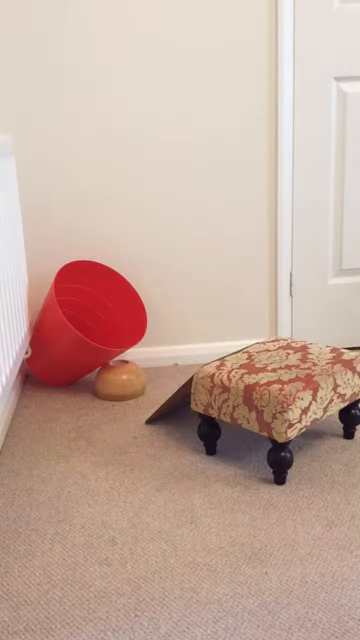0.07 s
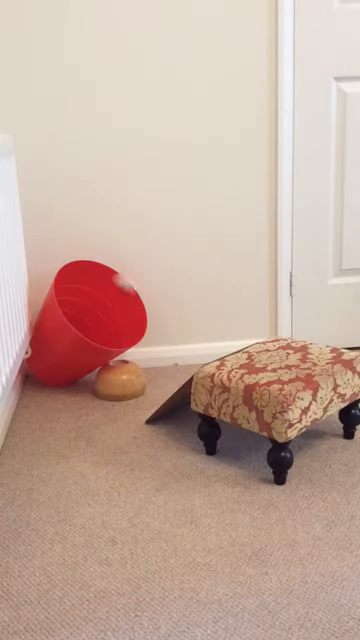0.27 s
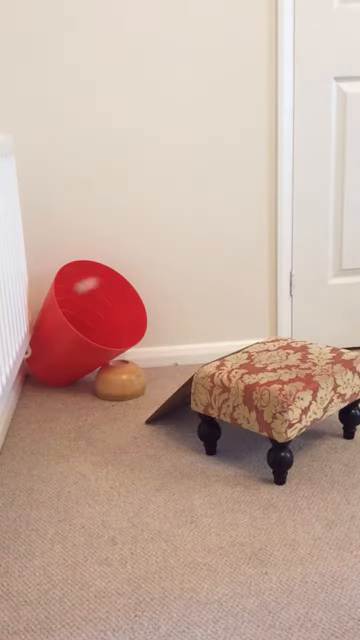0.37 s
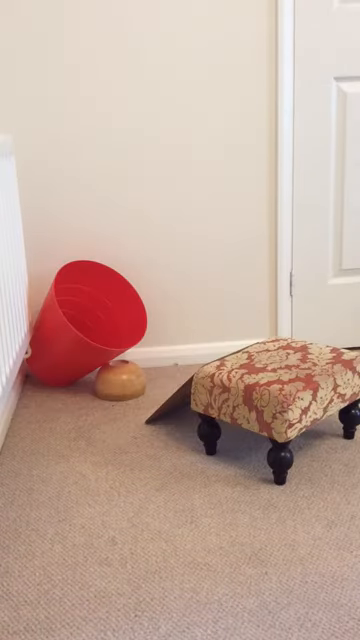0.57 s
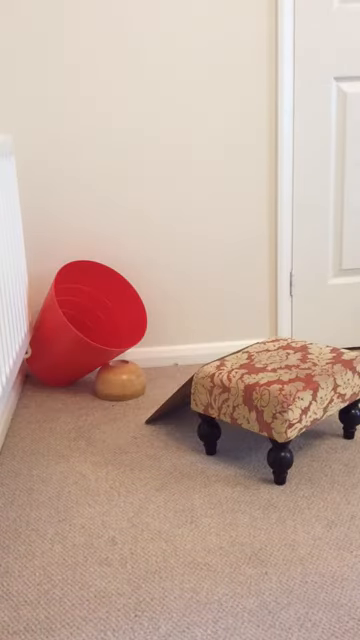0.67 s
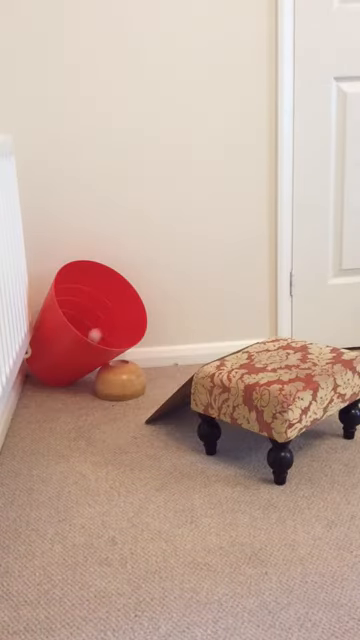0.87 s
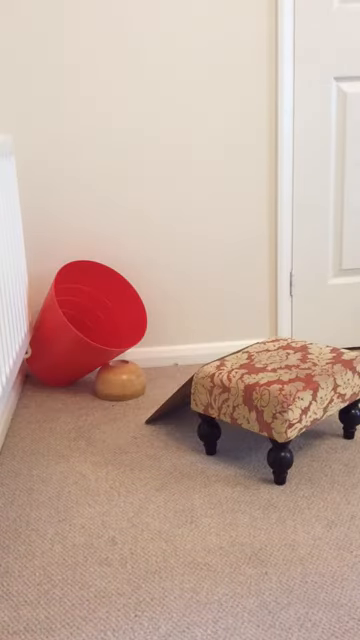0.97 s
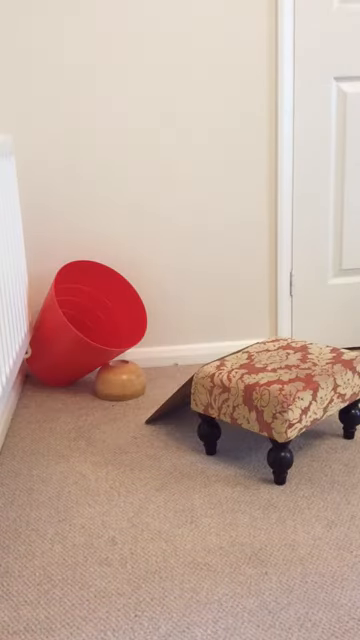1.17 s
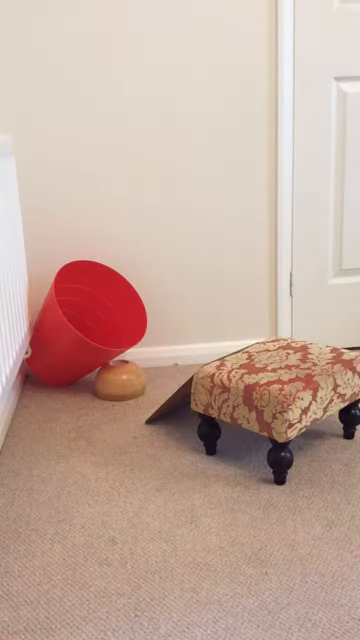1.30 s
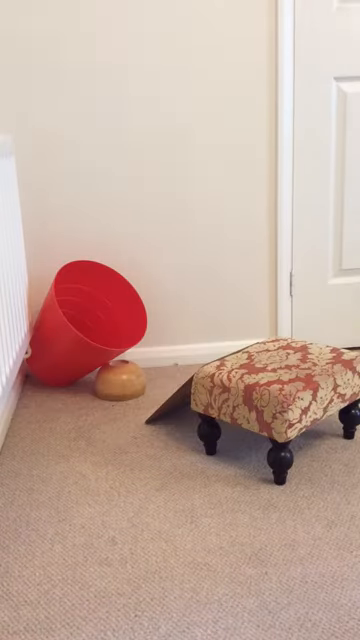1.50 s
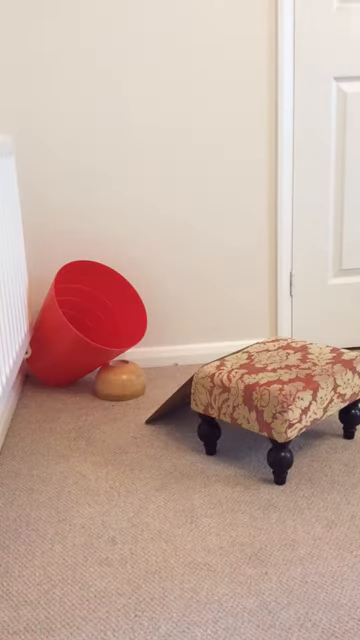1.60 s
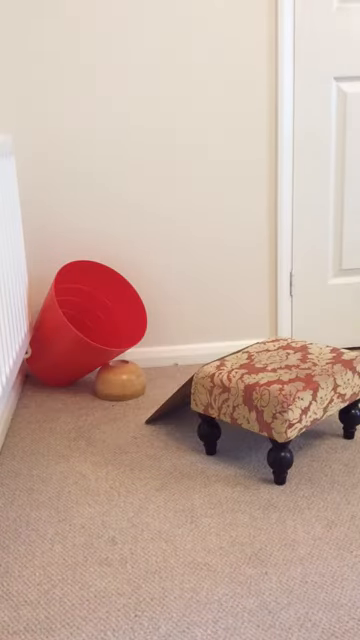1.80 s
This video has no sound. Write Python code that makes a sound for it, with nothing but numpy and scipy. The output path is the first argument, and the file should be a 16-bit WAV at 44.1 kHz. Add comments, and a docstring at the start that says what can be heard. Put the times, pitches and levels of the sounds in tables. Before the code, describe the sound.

A table-tennis ball knocks into a plastic bin with a few sharp, hollow pocks, then rattles on the bottom in quicker, fainter bounces. Soft low thuds and faint hiss sit underneath in a small, quiet carpeted room.

```python
"""A small carpeted room: a table-tennis ball bounces into a tilted plastic bin.
It strikes the wall, crosses the hollow with a pock, knocks on the base and rattles down in ever
smaller bounces. Each hit rings bin and ball; the hardest flex the whole bin; slides add fine grains.
Soft thuds come through the floor, over quiet room tone and faint swells of hiss."""
import sys
import numpy as np
from scipy import signal
from scipy.fft import rfft, irfft
from scipy.io import wavfile

SR = 44100
rng = np.random.default_rng(int(sys.argv[2]) if len(sys.argv) > 2 else 0)


def generate_wav(signal):
    """Clip the signal to [-1, 1] and save it as 16-bit WAV at the path in sys.argv[1]."""
    frames = np.transpose(np.atleast_2d(signal))
    scaled = np.clip(frames, -1, 1) * 32767
    pcm = np.round(scaled).astype(np.int16)
    wavfile.write(sys.argv[1], SR, pcm)


N = 81585
LEAD = SR // 10  # samples before time zero
TIME = np.arange(N) / SR


def from_db(db):
    """Decibels to gain."""
    return 10 ** (np.asarray(db) / 20)


def unit_rms(x):
    """Scale to rms 1."""
    return x / np.sqrt(np.mean(x ** 2) + 1e-20)


def unit_attack(x):
    """Scale to rms 1 over the first 20 ms."""
    return x / np.sqrt(np.mean(x[:int(0.02 * SR)] ** 2) + 1e-20)


def band(x, low_hz, high_hz):
    """Causal band-pass."""
    sos = signal.butter(2, [low_hz, min(high_hz, 0.45 * SR)], "band", fs=SR, output="sos")
    return signal.sosfilt(sos, x)


def bell(at_s, sigma_s):
    """Gaussian envelope."""
    return np.exp(-0.5 * ((TIME - at_s) / sigma_s) ** 2)


def coloured_noise(spectrum):
    """Steady noise of the given spectral shape, rms 1."""
    hz, db = np.transpose(spectrum)
    bins_hz = np.maximum(np.arange(N // 2 + 1) * SR / N, 1)
    gain = from_db(np.interp(np.log(bins_hz), np.log(hz), db))
    return unit_rms(irfft(rfft(rng.standard_normal(N)) * gain, N))


def tone_swells(rows):
    """Tones under Gaussian envelopes."""
    return sum(from_db(db) * bell(at_s, sigma_s) * np.cos(2 * np.pi * hz * (TIME - at_s))
               for at_s, db, hz, sigma_s in rows)


def noise_swells(noise, rows, low_hz, high_hz):
    """Band-passed noise under Gaussian envelopes."""
    envelope = sum(from_db(db) * bell(at_s, sigma_s) for at_s, db, sigma_s in rows)
    return unit_rms(band(noise, low_hz, high_hz)) * envelope


def ring(t, hz, db, t60_s):
    """Damped mode that builds up over about one cycle."""
    return from_db(db - 60 * t / t60_s) * np.sin(2 * np.pi * hz * t) * (1 - np.exp(-t * hz))


def room_tone():
    """Steady broad noise over a low rumble."""
    # spectral shapes (frequency [Hz], relative density [dB])
    tone = [(25, -15), (150, -5), (230, -14.5), (515, -3), (700, -11), (1400, -14), (2500, -21),
            (6500, -35), (8550, -27.5), (11200, -37.5), (15000, -39)]
    rumble = [(25, -20), (55, -22.5), (78, -1), (110, -11.5), (150, 3), (200, -14.5), (400, -23),
              (2000, -40)]
    return from_db(-57.5) * coloured_noise(tone) + from_db(-61) * coloured_noise(rumble)


def hiss():
    """Faint swells of treble noise."""
    # swells (time [s], level [dB], sigma [s])
    swells = [(0.177, -61.5, 0.032), (.33, -60, 0.036), (1.02, -66, 0.048), (1.35, -69.5, 0.13),
              (1.68, -67, 0.038)]
    return noise_swells(rng.standard_normal(N), swells, low_hz=2840, high_hz=7600)


def floor_thuds():
    """Soft low pulses through the floor."""
    # thuds (time [s], peak [dB], frequency [Hz], sigma [s])
    thuds = [(.09, -39.5, 79, 0.017), (.15, -34, 82, 0.018), (.285, -44.5, 75, 0.019),
             (.355, -41.5, 84, 0.016), (.462, -45, 76.5, 0.011), (.66, -54.5, 75.5, 0.064),
             (1.004, -37.5, 89, 0.0093), (1.07, -50.5, 74.4, 0.03), (1.19, -54, 79, .014)]
    return tone_swells(thuds)


def reverb(x):
    """Diffuse room reflections: quick build-up, separate decay per band."""
    # tail bands (low [Hz], high [Hz], t60 [s], gain [dB])
    tail_bands = [(187, 500, 0.23, -8.5), (550, 1000, 0.31, -9.5), (1054, 1800, 0.33, -9.5),
                  (2190, 5230, 0.23, -5.5), (7300, 13000, 0.17, -6.5)]
    t = np.arange(SR // 2) / SR
    onset = 1 - np.exp(-(t / 0.01) ** 2)
    tail = 0
    for low_hz, high_hz, t60_s, db in tail_bands:
        part = band(rng.standard_normal(len(t)), low_hz, high_hz) * from_db(-60 * t / t60_s) * onset
        unity_gain = np.sqrt(2 * (high_hz - low_hz) / SR / np.sum(part ** 2))
        tail += from_db(db) * unity_gain * part
    return signal.fftconvolve(x, tail)[:len(x)]


def ball_slides(grains_per_s=3100):
    """The ball slides on the plastic: fine friction grains."""
    # slides (time [s], level [dB], sigma [s])
    slides = [(0.98, -57, .005), (1.011, -61.5, 0.019), (1.315, -63.5, .016), (1.38, -67.5, 0.071),
              (1.67, -74, 0.037)]
    grains = rng.standard_normal(N) * (rng.random(N) < grains_per_s / SR)
    return noise_swells(grains, slides, low_hz=7800, high_hz=13300)


def hollow_pock():
    """One hit excites two broad resonances."""
    # resonances (time [s], peak [dB], frequency [Hz], sigma [s])
    resonances = [(.3731, -15.5, 1412, 0.0011), (.3731, -19.5, 1816, 0.001)]
    return tone_swells(resonances)


def bin_booms():
    """The hardest hits flex the whole bin."""
    # flexing modes (time [s], level [dB], frequency [Hz], t60 [s])
    booms = [(0.2093, -16.5, 226.6, 0.092), (.2095, -30, 60, 0.069), (.598, -27.5, 231, 0.064)]
    return sum(ring(np.maximum(TIME - at_s, 0), hz, db, t60_s) for at_s, db, hz, t60_s in booms)


def knock(levels_db, modes, spread_db, dense_trim_db):
    """One contact in five bands: clear modes plus a noise burst for the dense ones; the treble echoes."""
    # dense modes per band (low [Hz], high [Hz], t60 [s], level re clear modes before trim [dB])
    dense_bands = [(250, 705, 0.21, 2.5), (519, 1107, 0.14, 1.5), (1080, 1796, 0.053, 5),
                   (2000, 5330, 0.021, -3), (8040, 12050, 0.054, -2)]
    # band edges for the clear modes (frequency [Hz])
    edges_hz = [0, 560, 1080, 2150, 6500, 20000]
    # reflections off the bin and the near wall (delay [s], gain [dB])
    echoes = [(.0022, -26.5), (.0075, -10.5), (0.0158, -24), (.027, -25.5)]
    t = np.arange(SR // 5) / SR
    out = np.zeros(len(t))
    path_scale = 1 + 0.08 * rng.standard_normal()  # echo paths change as the ball moves
    for i, (low_hz, high_hz, dense_t60_s, dense_db) in enumerate(dense_bands):
        clear = np.zeros(len(t))
        for k, (hz, db, t60_s) in enumerate(modes):
            mode_db = db + spread_db * rng.standard_normal()
            if edges_hz[i] <= hz < edges_hz[i + 1]:
                clear += (-1) ** k * ring(t, hz, mode_db, t60_s)
        dense = band(rng.standard_normal(len(t)) * from_db(-60 * t / dense_t60_s), low_hz, high_hz)
        part = unit_attack(clear) + from_db(dense_db + dense_trim_db) * unit_attack(dense)
        if high_hz > 4000:
            part += sum(from_db(db) * np.interp(t - delay_s * path_scale, t, part, left=0)
                        for delay_s, db in echoes)
        out += from_db(levels_db[i]) * unit_attack(part)
    return out


def bounces(hits, bin_modes, spread_db, dense_trim_db):
    """Bin and ball ring at each hit; the ball's modes vary in pitch and strength with the spot struck."""
    # ball shell modes (frequency [Hz], relative level [dB], t60 [s])
    ball_modes = [(8210, 3.5, 0.013), (8840, 4, 0.013), (10160, -2, 0.01), (11110, -3, 0.015),
                  (12180, -2.5, 0.013), (14500, -10, .01)]
    out = np.zeros(LEAD + N + SR)
    for at_s, *levels_db in hits:
        spot_modes = [(hz * (1 + 0.016 * rng.standard_normal()), db + 4 * rng.standard_normal(), t60_s)
                      for hz, db, t60_s in ball_modes]
        sound = knock(levels_db, bin_modes + spot_modes, spread_db, dense_trim_db)
        start = LEAD + int(at_s * SR)
        out[start:start + len(sound)] += sound
    return out[:LEAD + N]


def wall_bounces():
    """The ball bounces toward the bin just before time zero, then strikes its wall."""
    # hits (time [s], bass [dB], low-mid [dB], mid [dB], crack [dB], ball ping [dB])
    approach = [(-0.018, -43.5, -40, -27, -44, -38.5)]
    hits = [(0.0285,-54,-47,-47,-59,-54), (0.2094,-28.5,-21.5,-26,-39.5,-31.5),
            (0.3706,-39,-36.5,-31.5,-40.5,-44.5), (0.473,-57,-62,-57.5,-62.5,-63),
            (0.5695,-41.5,-43.5,-35.5,-48,-45.5), (0.6499,-33,-41,-32,-46,-49),
            (0.7076,-44.5,-32,-39,-44.5,-48), (0.7673,-44,-41.5,-40.5,-49.5,-49),
            (0.831,-51.5,-44.5,-49,-59,-60), (0.9255,-74,-60.5,-61,-66,-67.5),
            (1.0149,-58,-49.5,-53,-59.5,-58.5)]
    # wall modes (frequency [Hz], relative level [dB], t60 [s])
    modes = [(312, 6, 0.14), (402, -14, 0.03), (491, 4, 0.12), (618, 2, 0.054), (733, -20, 0.024),
             (877, 5, 0.019), (964, -8.5, 0.084), (1195, -16, 0.061), (1335, 16.5, 0.036),
             (1504, 16.5, 0.026), (1820, -5, 0.025), (1907, 6, 0.1), (2037, 0, 0.096), (2480, 19.5, 0.013),
             (3162, 9, 0.027), (3680, 4, 0.023), (4870, 3, 0.016)]
    return bounces(approach + hits, modes, spread_db=2, dense_trim_db=-0.5)


def base_bounces():
    """The ball rattles down on the stiff base, which rings more purely than the wall."""
    # hits (time [s], bass [dB], low-mid [dB], mid [dB], crack [dB], ball ping [dB])
    hits = [(0.5974,-25.5,-25.5,-26,-44.5,-46.5), (1.0675,-32,-27,-28.5,-43,-61),
            (1.0822,-55,-34.5,-35,-48,-49), (1.1025,-56,-40,-41,-67,-68), (1.139,-42,-39.5,-41.5,-52.5,-55),
            (1.1977,-51,-43,-50,-59.5,-60.5), (1.2358,-56.5,-51,-49.5,-66,-62),
            (1.3175,-62,-62,-59.5,-76,-66), (1.341,-63,-57.5,-53,-77,-66), (1.405,-56.5,-49,-45,-57.5,-58),
            (1.474,-39.5,-34,-30,-50.5,-54.5), (1.508,-68,-38.5,-45.5,-54,-57.5),
            (1.5558,-47.5,-37.5,-36.5,-51,-65), (1.588,-60,-43.5,-46.5,-54,-58.5),
            (1.611,-52.5,-45.5,-44.5,-70,-78), (1.651,-57.5,-49,-52,-59,-60),
            (1.6996,-61,-57,-55.5,-63,-69), (1.7336,-76,-60,-56,-85,-72), (1.758,-62,-56,-67,-86,-83)]
    # base modes (frequency [Hz], relative level [dB], t60 [s])
    modes = [(228, -8.5, 0.096), (278.4, -10.5, 0.2), (323.2, -1.5, 0.15), (407.3, -6, 0.13),
             (470.8, -6, 0.13), (734.4, 0.5, 0.046), (810.5, 4.5, 0.072), (968, -12, .16),
             (1130.7, 6, 0.076), (1214, -4, 0.1), (1325, -8, 0.17), (1427, -10.5, 0.17),
             (1940, -10.5, 0.043), (2432, 3.5, 0.032), (2770, 0, 0.024), (3424, 6.5, 0.013)]
    return bounces(hits, modes, spread_db=-0.3, dense_trim_db=-5.5)


def scene():
    """Ball and bin with reverb, over the dry background; mono."""
    ball = wall_bounces() + base_bounces()
    ball[LEAD:] += bin_booms() + hollow_pock() + ball_slides()
    background = floor_thuds() + hiss() + room_tone()
    ball_in_room = (ball + reverb(ball))[LEAD:]
    return (ball_in_room + background)[None]


def record(dry):
    """Steep low-pass at 15.3 kHz."""
    return signal.sosfilt(signal.ellip(10, 0.2, 80, 15300, fs=SR, output="sos"), dry)


dry = scene()
out = record(dry)
generate_wav(out)
```